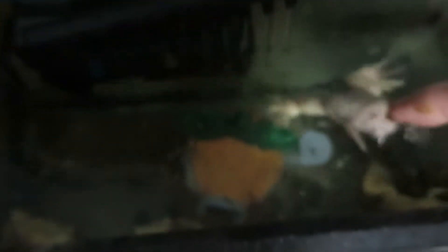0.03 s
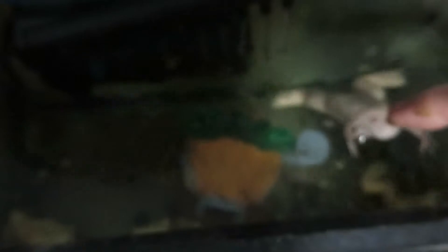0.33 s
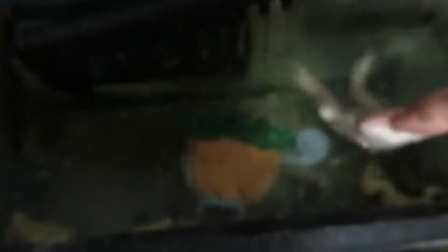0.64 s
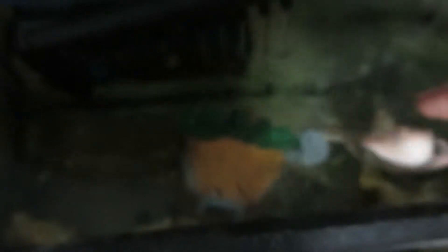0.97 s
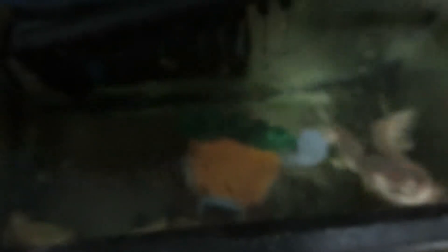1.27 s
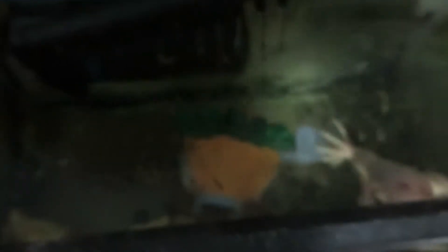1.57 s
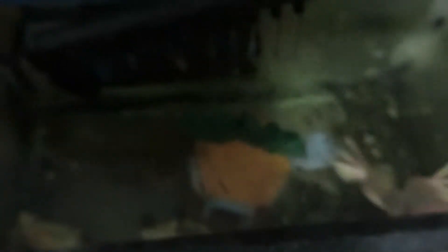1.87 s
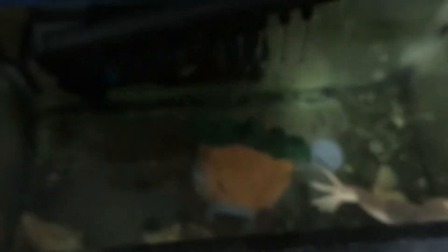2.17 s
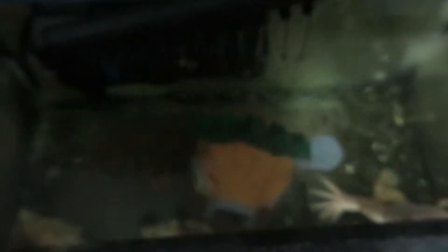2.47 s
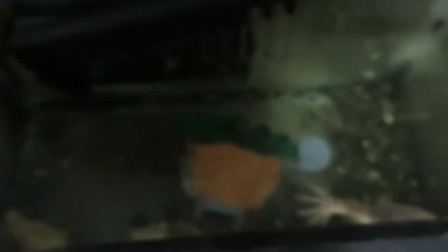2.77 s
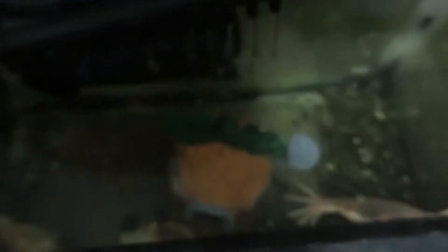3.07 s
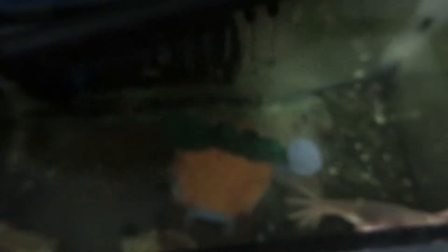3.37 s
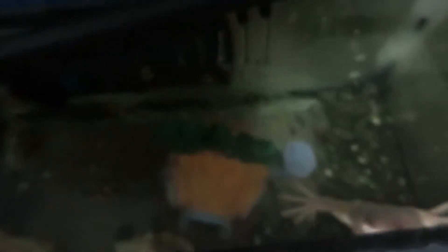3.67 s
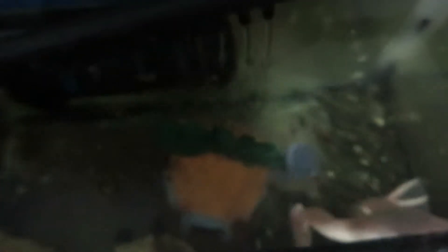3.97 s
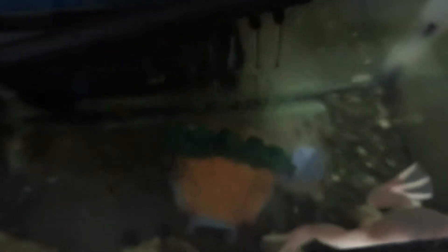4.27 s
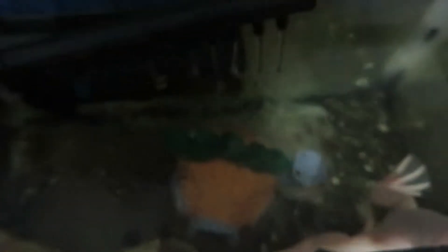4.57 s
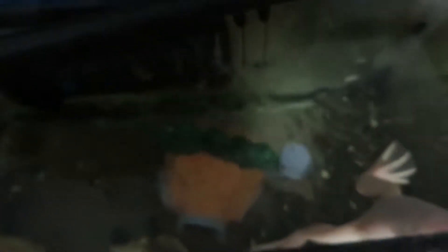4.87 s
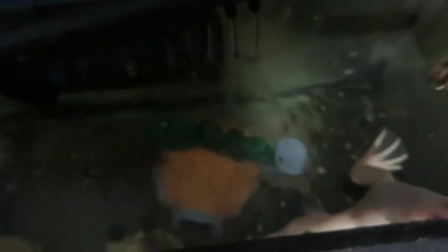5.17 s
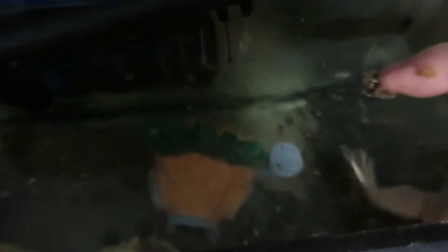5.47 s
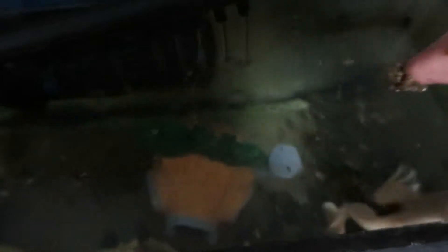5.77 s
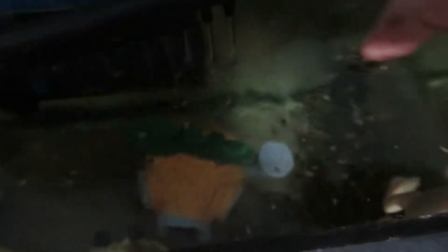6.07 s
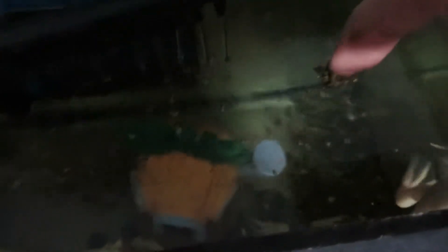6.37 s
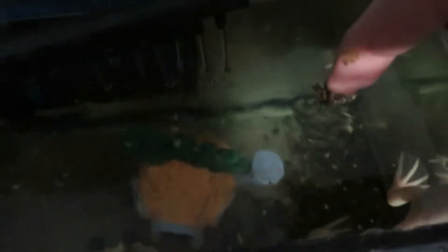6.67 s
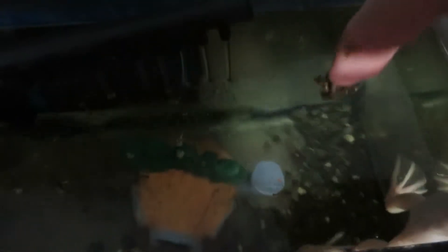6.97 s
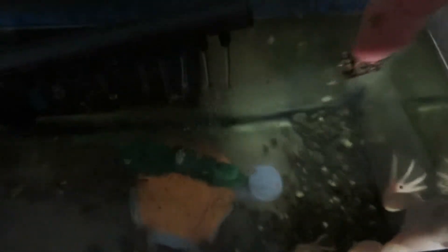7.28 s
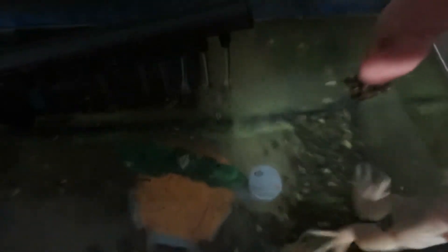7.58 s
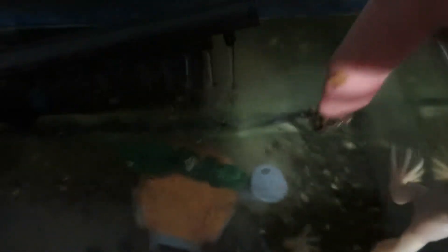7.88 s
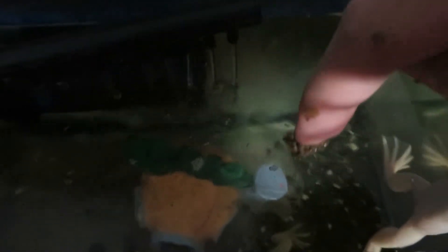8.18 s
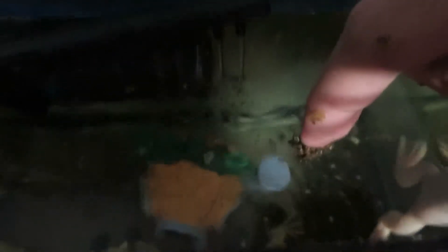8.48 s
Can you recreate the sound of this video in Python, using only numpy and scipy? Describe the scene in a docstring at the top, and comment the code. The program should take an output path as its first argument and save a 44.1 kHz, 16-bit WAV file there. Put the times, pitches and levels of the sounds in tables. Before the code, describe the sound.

A fish tank's filter pump runs steadily with a low electrical hum and a fine, buzzing sizzle. Close up, small bubbles burst at irregular moments with bright plinks and tiny splashes, and a few larger ones gurgle briefly. Now and then the tank's rim creaks in a short run of clicks. The bubbling gets busier past the middle. Heard in stereo from just above the water in a quiet room.

```python
"""At a fish tank in a quiet room, a stereo pair of microphones just above the water.
Behind everything the filter pump hums on the mains and sizzles twice in each cycle.
Now and then the rim creaks in a short run of slips as a hand moves over the tank.
Close up, bubbles burst with bright plinks and small splashes that the glass walls throw back:
clear ones among many faint ones, and a few larger ones that gurgle."""
import sys
import numpy as np
from scipy import signal
from scipy.fft import rfft, irfft, next_fast_len
from scipy.io import wavfile

SR = 44100
rng = np.random.default_rng(int(sys.argv[2]) if len(sys.argv) > 2 else 0)


def master_out(mix):
    """Clip the mix to full scale and print it as 16-bit PCM to the path in sys.argv[1]."""
    frames = np.transpose(np.atleast_2d(mix))
    ceiling = np.clip(frames, -1, 1)
    pcm = np.round(ceiling * 32767).astype(np.int16)
    wavfile.write(sys.argv[1], SR, pcm)


N = 384552
BLIP, BLIP_S = 2048, .005  # samples in a short sound; seconds over which its energy counts as rms
MAINS_HZ = 60

# room tone, mid channel: freq_hz, gain_db
ROOM_TONE = [(10, -14), (25, -4), (50, -33), (100, 3.5), (200, 0), (400, -3), (800, -9), (1300, -9.5),
             (2500, -10.5), (5000, -12.5), (10000, -26), (13000, -23.5), (15000, -71)]
# the microphones' own noise, side channel: freq_hz, gain_db
MIC_NOISE = [(20, -20), (40, -15), (80, -8.5), (150, 0.5), (300, 0.5), (600, -3.5), (1000, -9.5),
             (2000, -16), (3600, -25.5), (8000, -18), (13000, -30), (15000, -62)]
# decay of the room: freq_hz, t60_s
ROOM_DECAY = [(200, 1), (3500, 0.15), (12000, 0.083)]
# pump hum: mains_multiple, level_db
HUM_LINES = [(1, -88), (2, -41.5), (3, -50.5), (4, -69), (7, -81), (8, -68), (11, -70.5)]
# cabinet resonances: pitch_hz, width_hz, level_db
CABINET_MODES = [(32.1, 3.9, -63), (63.1, 7.1, -56.5), (82, 8.9, -55.5), (162.6, 9, -56.5),
                 (224.1, 3.8, -61), (571, 30, -65)]
# colour of the pump's hiss: freq_hz, gain_db
HISS_COLOUR = [(1000, -3.5), (2500, -5), (3100, -2.5), (3500, -5.5), (5000, -6), (5800, -0.5), (7300, 0.5),
               (8500, 2), (9300, -2), (10400, -2), (11500, -7.5), (12300, -33), (13300, -27), (15000, -60)]
# course of the hiss: time_s, level_db
HISS_LEVEL = [(0, -47.5), (1.9, -46), (3.2, -46.5), (4.2, -45), (5, -46.5), (6.2, -45), (7, -48),
              (7.5, -46.5), (8.72, -46.5)]
# pump housing resonances: pitch_hz, width_hz, gain_db
HOUSING_MODES = [(1550, 217, 5.5), (3070, 250, -1.5)]
# course of the housing's ring, before its trim: time_s, level_db
HOUSING_LEVEL = [(0, -53.5), (8.72, -59)]
# thin resonances in the sizzle: pitch_hz, width_hz, gain_db
WHISTLE_MODES = [(4400, 89, -3.5), (5830, 450, 3.5), (6810, 840, 9), (8170, 500, -12), (8000, 610, 4)]
# course of the thin resonances: time_s, level_db
WHISTLE_LEVEL = [(0, -49), (2.5, -51), (4.6, -52), (6.2, -59), (8.72, -78)]
# stereo width of the sizzle, side against mid: freq_hz, side_db
SIZZLE_WIDTH = [(1500, -22), (3600, -27), (5500, -16), (8000, -5.5), (12000, -1)]
# colour of a slip's thud: pitch_multiple, gain_db
THUD_COLOUR = [(.2, -6), (.6, -1.5), (1, 1), (1.5, -3.5), (3, -14.5), (8, -38), (16, -65)]
# colour of a slip's click: pitch_multiple, gain_db
CLICK_COLOUR = [(.12, -22), (.34, -9), (.54, 0), (.7, -9), (.85, 2), (1, 5.5), (1.18, -4.5), (1.38, -14),
                (1.8, -14), (4.2, -49)]
# runs of slips at the rim: start_s, length_s, gap_s, growth_db, thud_hz, thud_db, click_hz, click_db
CREAKS = [(0.822, .004, .006, 0, 560, -38, 2980, -36.5),
          (0.8626, .005, 0.0034, 5.5, 1010, -36, 3040, -36.5),
          (0.87, .005, 0.0034, -3, 590, -33, 3130, -33), (.8826, .004, .006, 0, 805, -38, 3050, -33),
          (0.9124, .004, .006, 0, 1600, -42, 3030, -35.5), (0.9282, .004, .006, 0, 1750, -46, 2950, -33),
          (0.9465, .004, .006, 0, 1500, -55, 2950, -45), (1.9, .021, .0052, 4, 575, -38, 3900, -42),
          (1.9234, .004, .006, 0, 2100, -31.5, 4000, -36), (1.929, .025, 0.0063, -3, 580, -44, 4050, -40),
          (2.044, .004, .006, -6, 1900, -55, 2850, -39), (2.069, .004, .006, 0, 1510, -43, 2370, -38),
          (2.684, .022, .008, -7, 700, -39, 3000, -61), (3.8858, .004, 0.0063, 0, 764, -36, 3300, -49),
          (3.901, .075, .011, 0, 495, -41, 3400, -46), (3.9863, .004, 0.0063, 0, 416, -32, 3450, -28),
          (3.994, .014, .0098, -3, 315, -34, 3180, -39), (4.02, .012, .013, 0, 323, -38.5, 3200, -52),
          (5.752, .004, .006, 0, 430, -37, 2670, -40), (5.765, .06, 0.017, -2, 474, -45, 3000, -54),
          (5.837, .08, 0.06, -4, 900, -44, 3300, -55)]
# larger bubbles gurgling upwards: start_s, start_pitch_hz, level_db
BLOOPS = [(3.49, 1640, -44), (5.567, 1980, -38), (5.899, 1900, -43.5), (7.143, 2190, -39),
          (8.462, 2205, -33)]
# air over the water, rung by each splash: pitch_hz, gain_db, t60_s
HOLLOW_MODES = [(1785, -9, 0.012), (2700, -10.5, 0.017), (2980, -9.5, 0.038), (3650, 2, 0.005),
                (4450, 6, 0.01), (5400, 2.5, 0.011), (7430, -1.5, 0.016)]
# colour of a snapping bubble film: freq_hz, gain_db
SNAP_COLOUR = [(500, 19), (1800, 16), (3000, -18), (5000, -7.5), (7500, 3), (10500, 5), (12500, -4.5),
               (14500, -19), (16000, -42)]
# how often faint bubbles burst: time_s, bursts_per_s
FAINT_RATE = [(0, 2), (1.3, 2), (2.2, 3), (3.2, 3), (4.6, 3), (5.6, 7), (6.25, 15), (6.6, 4), (7.6, 7),
              (8.1, 3), (8.72, 12)]
# sizes of faint bubbles, before scatter: pitch_hz, ring_db, snap_db, splash_db
FAINT_SIZES = [(2850, -47, -61, -54), (4020, -48.5, -49, -60), (5300, -44, -61, -50), (6960, -43, -46, -45),
               (10360, -41.5, -48, -56)]
# the clear bursting bubbles: start_s, pitch_hz, ring_db, snap_db, splash_db
CLEAR_BUBBLES = [(0.0481, 4220, -32.5, -34.5, -48), (.268, 2850, -38.5, -58, -55),
                 (.75, 7400, -42, -33, -37.5), (.7806, 10360, -34, -33.5, -44),
                 (1.1807, 6900, -49, -32.5, -42), (1.473, 2971, -42, -57, -41),
                 (1.514, 8460, -25, -35, -33), (1.7441, 4100, -31.5, -55, -52),
                 (1.8404, 3740, -14.5, -28.5, -24), (1.8406, 3100, -22.5, -29, -32),
                 (1.8407, 2340, -31.5, -40, -45), (1.8406, 4450, -22, -36, -35),
                 (1.9338, 4130, -33, -46, -46), (1.9444, 6955, -37, -39, -47),
                 (1.9877, 11000, -31.5, -41, -58), (2.0448, 4200, -25, -40, -41),
                 (2.129, 8900, -46, -37, -58), (2.155, 9850, -33, -43, -58), (2.3252, 5400, -30, -33, -55),
                 (2.4065, 5360, -30, -37, -45), (2.4337, 8900, -34, -30, -55), (2.529, 7100, -38, -41, -52),
                 (2.573, 3900, -36, -57, -45), (2.738, 4200, -37.5, -57, -55), (2.798, 7230, -35, -32, -54),
                 (2.8492, 7380, -28, -32.5, -46), (2.952, 4200, -42, -55, -50),
                 (3.163, 7100, -44, -36.5, -58), (3.3865, 9400, -35, -37, -58),
                 (3.414, 7404, -25.5, -27, -55), (3.4942, 6136, -41, -39, -41),
                 (3.6045, 2930, -41.5, -57, -52), (3.714, 3860, -44, -46, -38),
                 (3.9278, 4263, -38, -50, -52), (4.0594, 7000, -27.5, -29.5, -50),
                 (4.5149, 3920, -32.5, -39, -35), (4.6114, 10300, -34.5, -46, -58),
                 (4.7886, 4010, -28, -46, -39), (4.831, 5020, -31, -39.5, -42),
                 (4.915, 10460, -29, -35, -58), (5.0132, 5500, -34.5, -46, -56),
                 (5.0362, 10300, -29.5, -51, -58), (5.1272, 5500, -33, -34.5, -35),
                 (5.196, 7200, -32, -44, -55), (5.2633, 5800, -24.5, -29.5, -38),
                 (5.329, 5350, -41, -44, -40), (5.527, 4520, -29, -47, -37), (5.577, 5470, -27, -31, -44),
                 (5.586, 5710, -40, -45, -52), (5.6645, 4360, -38, -39.5, -33),
                 (5.671, 4400, -20.5, -35, -34), (5.766, 4450, -32, -33, -37), (5.863, 9180, -38, -30, -33),
                 (5.909, 4270, -42, -39.5, -33), (5.9245, 10900, -36, -44, -46),
                 (5.993, 5300, -37.5, -44, -50), (6.0922, 3950, -31, -45, -37),
                 (6.1406, 4900, -36, -46, -51), (6.1896, 4380, -33, -35.5, -40),
                 (6.2135, 4560, -40, -35, -37), (6.2416, 2700, -43, -48, -38), (6.331, 5300, -41, -41, -51),
                 (6.39, 3000, -34.5, -47, -40), (6.6124, 8950, -32, -28, -52), (6.643, 5060, -17, -25, -50),
                 (6.785, 4730, -33.5, -46, -53), (6.862, 7570, -33, -28.5, -42),
                 (7.081, 2710, -40.5, -57, -55), (7.2322, 4100, -39, -39.5, -51),
                 (7.2978, 4130, -34.5, -35.5, -48), (7.4096, 5770, -34, -39, -44),
                 (7.421, 3700, -41, -55, -46), (7.478, 5860, -31, -31.5, -37), (7.541, 2660, -44, -54, -42),
                 (7.569, 4030, -32, -47, -39), (7.63, 3150, -43, -54, -52), (7.664, 3962, -43, -47, -46),
                 (7.888, 3870, -41, -41, -42), (7.973, 7760, -43, -31.5, -40), (8.219, 4180, -43, -48, -54),
                 (8.237, 3120, -44, -56, -56), (8.305, 4586, -40, -35, -46), (8.333, 4100, -37, -54, -52),
                 (8.374, 4080, -36.5, -48, -40), (8.454, 4150, -34.5, -34.5, -36),
                 (8.5032, 8650, -39, -34.5, -58), (8.563, 4020, -33.5, -38, -35),
                 (8.572, 9689, -40, -42, -42), (8.6276, 3140, -33, -38, -40), (8.628, 7000, -45, -32, -48)]
# left microphone minus right: freq_hz, difference_db
MIC_BALANCE = [(100, 0), (1000, 0.5), (2500, 0), (5000, 0), (8000, 2), (12000, 2)]


def amp(db):
    """Decibels to gain."""
    return 10 ** (np.asarray(db) / 20)


def unit(x):
    """Scale to rms 1."""
    return x / np.sqrt(np.mean(x ** 2) + 1e-20)


def blip(x):
    """Scale a short sound to the energy of rms 1 lasting BLIP_S."""
    return x / np.sqrt(np.mean(np.sum(x ** 2, -1)) / (BLIP_S * SR) + 1e-20)


def along(points, hz):
    """Read (freq_hz, value) points on a log frequency axis."""
    freqs, values = np.transpose(points)
    return np.interp(np.log(hz + 1), np.log(freqs + 1), values)


def wobble(rate):
    """A slow random curve, rate knots a second."""
    knots = rng.standard_normal(int(N * rate / SR) + 2)
    return np.interp(np.arange(N) * rate / SR, np.arange(len(knots)), knots)


def filtered(x, response):
    """Pass x through a response, a function of frequency."""
    size = next_fast_len(N + 8192)
    return irfft(rfft(x, size) * response(np.fft.rfftfreq(size, 1 / SR)), size)[..., :N]


def coloured(x, points):
    """Give x a (freq_hz, gain_db) colour."""
    return filtered(x, lambda hz: amp(along(points, hz)))


def causal(points):
    """Minimum-phase response of a (freq_hz, gain_db) colour, for short sounds."""
    cepstrum = irfft(np.log(amp(along(points, np.fft.rfftfreq(BLIP, 1 / SR)))))
    cepstrum[1:BLIP // 2] *= 2
    cepstrum[BLIP // 2 + 1:] = 0
    return np.exp(rfft(cepstrum))


def resonate(x, modes):
    """Noise x through steep (pitch_hz, width_hz, level_db) resonances, each at its own rms level."""
    def band(hz, pitch, width):
        peak = 1j * hz * width / (pitch ** 2 - hz ** 2 + 1j * hz * width)
        return peak ** 2 * np.sqrt(2 * SR / (np.pi * width))  # white noise keeps its power
    return filtered(unit(x), lambda hz: sum(amp(db) * band(hz, f, width) for f, width, db in modes))


def stereo(mid, side):
    """Left and right from mid and side."""
    return np.array([mid + side, mid - side])


def add(track, start_s, sound):
    """Mix a short stereo sound into the track."""
    i = max(int(start_s * SR), 0)
    part = track[:, i:i + BLIP]
    part += sound[:, :part.shape[1]]


def background(mid_db=-47.0, side_db=-46.5):
    """Steady background rush: room tone in the middle, wide low microphone noise at the sides."""
    mid = unit(coloured(rng.standard_normal(N), ROOM_TONE))
    side = unit(coloured(rng.standard_normal(N), MIC_NOISE))
    return stereo(amp(mid_db) * mid, amp(side_db) * side)


def room(x):
    """The room answers with a diffuse tail, shorter in the treble."""
    hz, t, noise = signal.stft(rng.standard_normal((2, SR // 2)), SR, nperseg=256)
    fade = amp(-60 * t / along(ROOM_DECAY, hz)[:, None])
    tail = signal.istft(noise * fade, SR, nperseg=256)[1]
    response = np.pad(tail, ((0, 0), (200, 0))) / np.linalg.norm(tail[0])
    return signal.fftconvolve(x, response, axes=1)[:, :N]


def hum(waver_db=.14):
    """Mains harmonics of the pump over the low drone of the cabinet, a shade left of centre."""
    t = np.arange(N) / SR
    lines = np.zeros(N)
    for multiple, db in HUM_LINES:
        peak = np.sqrt(2) * amp(db + waver_db * wobble(3.8))
        lines += peak * np.sin(2 * np.pi * (multiple * MAINS_HZ * t + rng.random()))
    drone = resonate(rng.standard_normal(N), CABINET_MODES)
    return (lines + drone) * amp([[.3], [-.3]])


def sizzle(attack_s=.0017, decay_s=.0042, scatter_db=2.0, swell_db=1.0, housing_trim_db=-1.5):
    """The impeller chatters every half cycle of the mains: uneven hissing bursts ring the housing."""
    t = np.arange(N) / SR
    rate_hz = 2 * MAINS_HZ
    beat, phase = np.divmod(rate_hz * t + .55, 1)
    age_s, k = phase / rate_hz, beat.astype(int)
    sizes = amp(scatter_db * rng.standard_normal(k[-1] + 2))
    stroke = lambda s: (1 - np.exp(-s / attack_s)) * np.exp(-s / decay_s)
    # each burst starts over the tail of the one before
    drive = np.hypot(sizes[k + 1] * stroke(age_s), sizes[k] * stroke(age_s + 1 / rate_hz))
    drive *= amp(swell_db * wobble(9))
    chatter = lambda: drive * rng.standard_normal((2, N))
    spread = lambda pair: unit(stereo(pair[0], coloured(pair[1], SIZZLE_WIDTH)))
    gain = lambda course: amp(np.interp(t, *np.transpose(course)))
    hiss = gain(HISS_LEVEL) * spread(coloured(chatter(), HISS_COLOUR))
    housing = gain(HOUSING_LEVEL) * spread(resonate(chatter(), HOUSING_MODES))
    whistle = gain(WHISTLE_LEVEL) * spread(resonate(chatter(), WHISTLE_MODES))
    return hiss + amp(housing_trim_db) * housing + whistle


def pane(x, pitch_hz=3530, t60_s=.35, gain_db=-10):
    """A glass pane sings on faintly after a burst near its own pitch."""
    t = np.arange(SR // 2) / SR
    fade = amp(-60 * t / t60_s)
    ring = 2 * fade / fade.sum() * np.sin(2 * np.pi * pitch_hz * t)
    return amp(gain_db) * signal.fftconvolve(x, ring[None], axes=1)[:, :N]


def walls(x, glass_gain=.31, lid_gain=.13, lid_s=.0083, spread_s=.000032, count=6):
    """Direct sound, quick echoes off the glass and a later one from above, at both microphones."""
    hz = np.fft.rfftfreq(BLIP, 1 / SR)
    paths_s = np.append(rng.uniform(.000488, .003, count), lid_s * rng.uniform(.98, 1.1))
    arrivals_s = paths_s + spread_s * rng.standard_normal((2, 1 + count)) / 2
    gains = np.append(glass_gain * rng.standard_normal(count), lid_gain)
    echoes = gains[:, None] * np.exp(-2j * np.pi * arrivals_s[..., None] * hz)
    return irfft(rfft(x) * (1 + echoes.sum(1)))


def kick(colour, t60_s, tail_db=-5):
    """One sharp push with a weaker rattling tail, in a given colour."""
    t = np.arange(BLIP) / SR
    tail = rng.standard_normal(BLIP) * amp(-60 * t / t60_s)
    push = (t == 0) + amp(tail_db) * tail / np.linalg.norm(tail)
    return irfft(rfft(push) * colour)


def thud(hz, ring_db=-2.5, ring_cycles=13):
    """A dull push that leaves the tank ringing briefly, longer when lower."""
    t, t60_s = np.arange(BLIP) / SR, ring_cycles / hz
    ring = np.sin(2 * np.pi * hz * t) * amp(-60 * t / t60_s) * (1 - np.exp(-2 * hz * t))
    colour = causal([(multiple * hz, db) for multiple, db in THUD_COLOUR])
    push = kick(colour, t60_s / 2)
    return blip(walls(blip(push) + amp(ring_db) * blip(ring)))


def creaks(uneven=.06, pitch_scatter=.021, click_t60_s=.007):
    """The rim slips in uneven runs, some growing or fading; each slip gives a thud and a dry click."""
    out = np.zeros((2, N))
    for start_s, length_s, gap_s, growth_db, thud_hz, thud_db, click_hz, click_db in CREAKS:
        colour = causal([(multiple * click_hz, db) for multiple, db in CLICK_COLOUR])
        for k, after_s in enumerate(np.arange(0, length_s, gap_s)):
            late, detune = rng.standard_normal(2)
            body = amp(thud_db) * thud(thud_hz * np.exp(pitch_scatter * detune))
            click = amp(click_db) * blip(walls(kick(colour, click_t60_s)))
            slip_s = start_s + after_s + (k > 0) * uneven * gap_s * late
            add(out, slip_s, amp(growth_db * after_s / length_s) * (body + click))
    return out


def bloops(attack_s=.0009, decay_s=.0032, gap_s=.007, loss_db=3.0,
           step_octaves=.2, scatter_octaves=.03, rise_octaves_per_s=20):
    """A larger bubble breaks in two, the second part smaller and weaker; each rings up in pitch."""
    out, t = np.zeros((2, N)), np.arange(BLIP) / SR
    envelope = (1 - np.exp(-t / attack_s)) * np.exp(-t / decay_s)
    for start_s, hz, db in BLOOPS:
        for k, detune in enumerate(rng.standard_normal(2)):
            octaves = k * (step_octaves + scatter_octaves * detune) + rise_octaves_per_s * t
            ring = envelope * np.sin(2 * np.pi * np.cumsum(hz * 2 ** octaves) / SR)
            add(out, start_s + k * gap_s, amp(db - k * loss_db) * blip(walls(ring)))
    return out


def splash(detune=.033, scatter_db=3.5):
    """Thrown water rings the hollow over the surface, a little differently at every spot."""
    t = np.arange(BLIP) / SR
    hz, db, t60_s = np.transpose(HOLLOW_MODES)[..., None]
    shift, strength = rng.standard_normal((2, len(HOLLOW_MODES), 1))
    envelopes = amp(db + scatter_db * strength - 60 * t / t60_s)
    modes = envelopes * np.sin(2 * np.pi * hz * (1 + detune * shift) * t)
    return blip(walls(modes[::2].sum(0) - modes[1::2].sum(0)))  # neighbours alternate in sign


def plink(hz, ring_db, snap_db, colour, life_at_5k_s=.0021, life_scatter_octaves=.3,
          collapse=2.2, rise=.0029, snap_t60_s=.0024, cavity_db=4, cavity_q=2.4):
    """A film snaps and the cavity rings, rising as it collapses; small ones ring higher and shorter."""
    t = np.arange(BLIP) / SR
    life_s = life_at_5k_s * np.sqrt(5000 / hz) * 2 ** (life_scatter_octaves * rng.standard_normal())
    age = t / life_s
    pitch_hz = hz * (1 + rise * (np.minimum(age, 2) - 1 / 3))
    ring = np.sin(2 * np.pi * np.cumsum(pitch_hz) / SR) * np.exp(-age ** collapse)
    snap = rng.standard_normal(BLIP) * amp(-60 * t / snap_t60_s)
    z = 1j * np.fft.rfftfreq(BLIP, 1 / SR) / hz
    cavity = 1 + amp(cavity_db) * z / (cavity_q * (z * z + 1) + z)  # the cavity also colours the snap
    radiation = (z * z / (z * z + z * np.sqrt(.5) + .5)) ** 2  # little radiates far below its pitch
    ring = irfft(rfft(ring) * radiation)
    snap = irfft(rfft(snap) * colour * cavity * radiation)
    return amp(ring_db) * blip(walls(ring)) + amp(snap_db) * blip(walls(snap))


def bubbles(spread_db=1, spread_octaves=.16, candidates=220):
    """Bubbles burst just under the microphones: clear plinks and splashes, faint ones by chance."""
    out, colour = np.zeros((2, N)), causal(SNAP_COLOUR)
    for start_s, hz, ring_db, snap_db, splash_db in CLEAR_BUBBLES:
        add(out, start_s, plink(hz, ring_db, snap_db, colour) + amp(splash_db) * splash())
    for when, chance, size, detune, strength in rng.random((candidates, 5)):
        start_s = when * N / SR
        hz, ring_db, snap_db, splash_db = FAINT_SIZES[int(size * len(FAINT_SIZES))]
        hz *= 2 ** (spread_octaves * (2 * detune - 1))
        sound = plink(hz, ring_db, snap_db, colour) + amp(splash_db) * splash()
        bursts_per_s = np.interp(start_s, *np.transpose(FAINT_RATE))
        if chance * candidates < bursts_per_s * N / SR:
            lift_db = spread_db * min(-np.log(strength), np.e)
            add(out, start_s, amp(lift_db) * sound)
    return out


def scene(room_db=-17):
    """Bubbles and creaks close up, ringing the glass and the room, over the pump and a steady rush."""
    near = bubbles() + bloops() + creaks()
    return near + pane(near) + amp(room_db) * room(near) + hum() + sizzle() + background()


def record(dry, left_lead_s=.00001, ceiling=1.0, top_hz=16300):
    """Two microphones, slightly unlike, the left a little nearer; peaks are rounded, the top cut off."""
    halves = np.array([[.5], [-.5]])
    balance = lambda hz: amp(halves * along(MIC_BALANCE, hz))
    lead = lambda hz: np.exp(2j * np.pi * hz * halves * left_lead_s)
    heard = filtered(dry, lambda hz: balance(hz) * lead(hz))
    rounded = heard / (1 + (heard / ceiling) ** 4) ** .25
    return filtered(rounded, lambda hz: hz < top_hz)


dry = scene()
out = record(dry)
master_out(out)
```